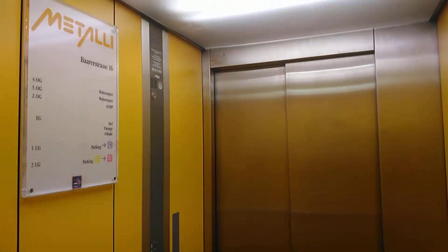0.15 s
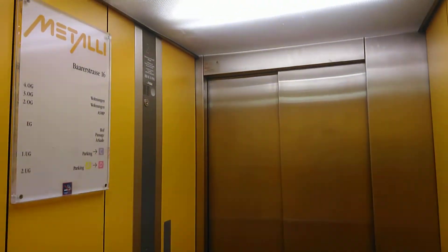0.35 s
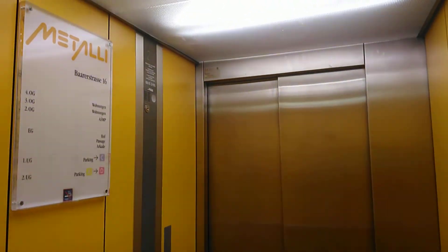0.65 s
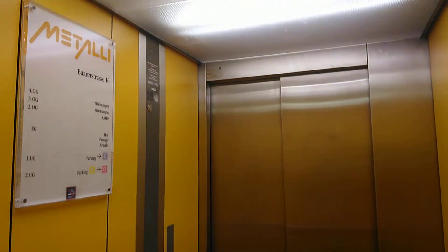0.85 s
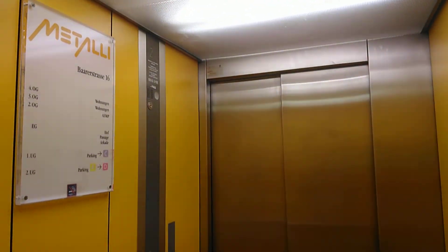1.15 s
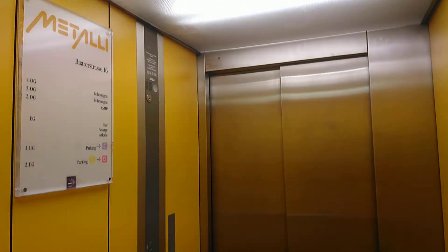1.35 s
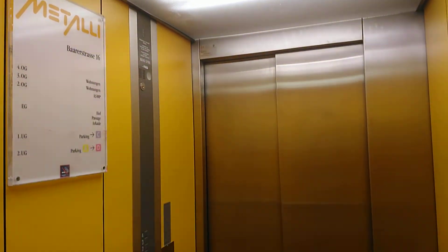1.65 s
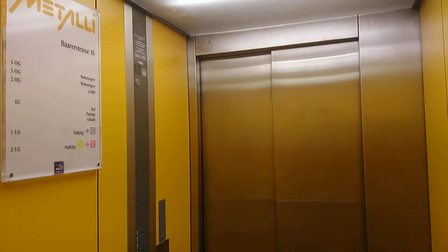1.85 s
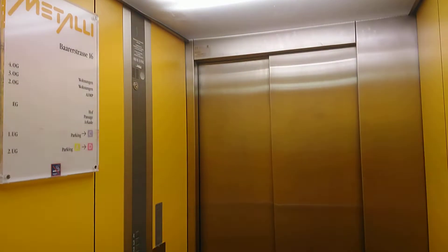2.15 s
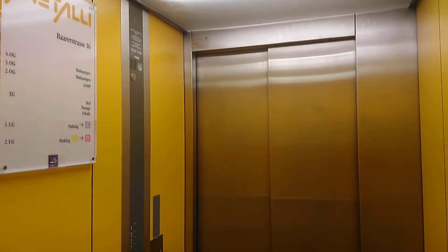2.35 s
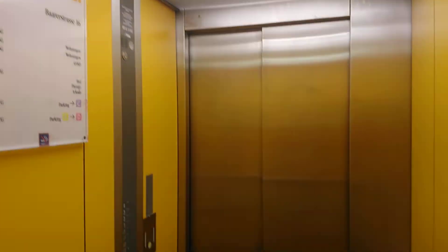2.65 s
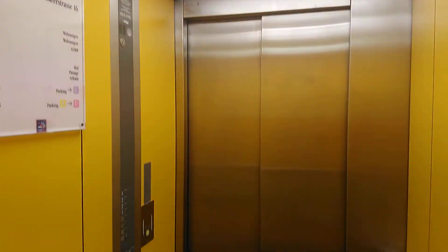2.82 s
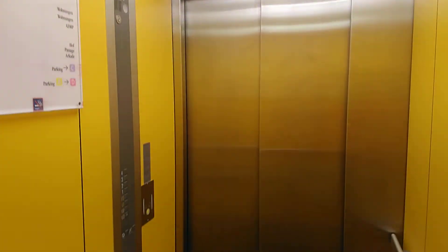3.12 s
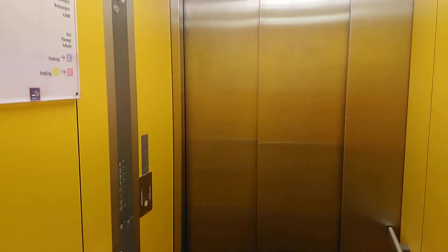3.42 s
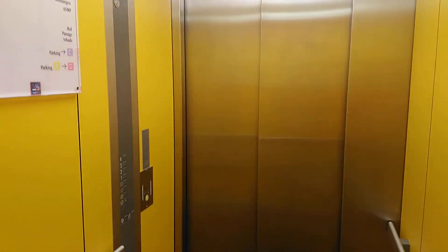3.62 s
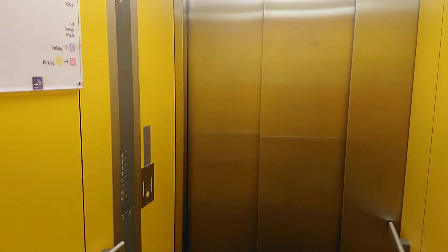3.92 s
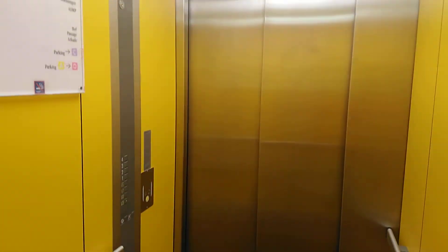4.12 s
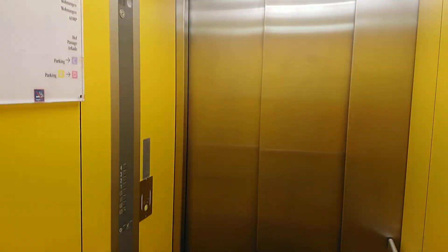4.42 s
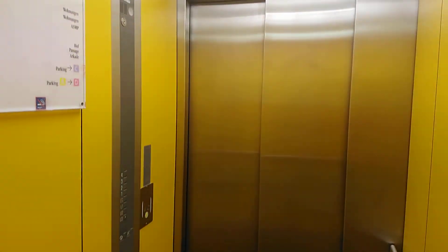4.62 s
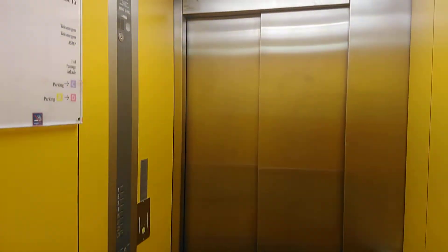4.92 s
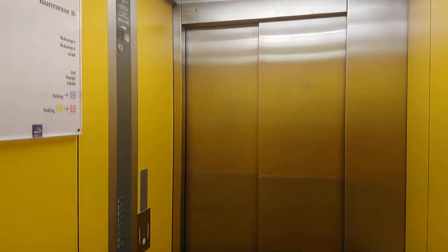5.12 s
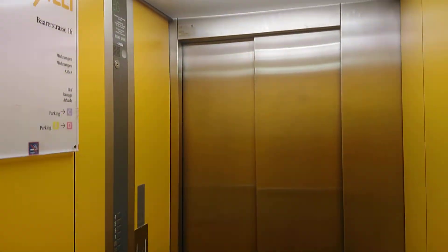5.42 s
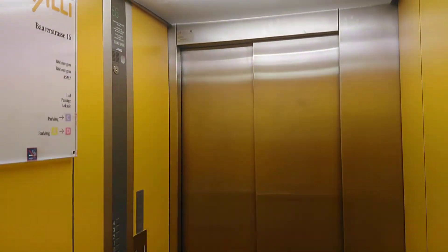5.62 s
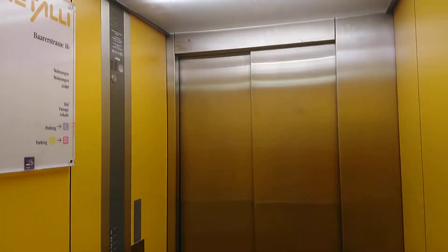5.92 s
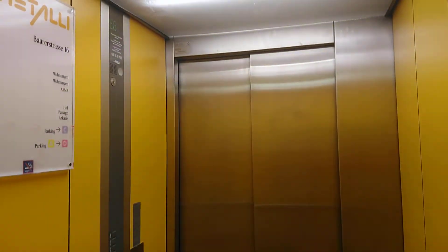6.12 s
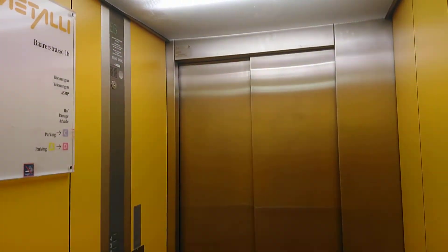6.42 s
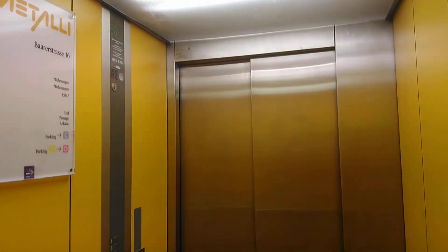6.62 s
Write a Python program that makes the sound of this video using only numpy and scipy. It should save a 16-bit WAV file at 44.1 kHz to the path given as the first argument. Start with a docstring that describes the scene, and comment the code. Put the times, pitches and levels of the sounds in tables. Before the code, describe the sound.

A quiet lift ride from within the car. The low motor drone dominates, swelling early, weakening around the middle with slow uneven beating, then returning. Under it is hum; above it, hollow guide-roller rumble, panel vibration and soft rushing air. Small dry ticks and gentle swishes pass by, then a fitting clinks and rattles briefly with tiny squeaks. Wide, enclosed stereo sound.

```python
"""The drive of a small passenger lift makes the cabin boom near 71 Hz, a sine that now and then throbs by beating.
A mains hum at 100 Hz and the random sway of the frame lie under it. Guide rollers rumble and drone through the
cabin's resonances, rail noise shakes the wall panels, and shaped noise makes the air rushing along the shaft.
Faint ticks (damped modes with reflections), squeaks (tone and noise) and swishes (bright noise) are scattered
through the ride, with one short metallic clink of ringing modes and rattle as the car passes a fitting."""
import sys
import numpy as np
from scipy import signal
from scipy.fft import rfft, irfft, next_fast_len
from scipy.io import wavfile

SR = 44100
rng = np.random.default_rng(int(sys.argv[2]) if len(sys.argv) > 2 else 0)


def bounce(signal):
    """Save signal as a 16-bit WAV file at the path given by the first command-line argument."""
    frames = np.transpose(np.atleast_2d(signal))
    limited = np.clip(frames, -1, 1)
    pcm = np.round(limited * 32767).astype(np.int16)
    wavfile.write(sys.argv[1], SR, pcm)


N = 298333
T = np.arange(N) / SR   # time, s
SIZE = next_fast_len(N)
BINS = np.maximum(np.arange(SIZE // 2 + 1) * SR / SIZE, 1)   # frequency of each spectral bin, Hz

# correlation of the sound field between left and right: frequency_hz, correlation (-1 to 1)
LIKENESS = [(60, 0.72), (160, 0.99), (260, 0.98), (330, 0.85), (450, 0.63), (740, 0.73), (1000, 0.39),
            (1250, -0.33), (2000, -0.066), (3500, 0.077), (15000, -0.12)]


def from_db(db):
    """Level to amplitude: 20 dB is a factor of ten."""
    return 10 ** (np.asarray(db) / 20)


def rms_one(x):
    """Normalisation to unit mean power."""
    return x / np.sqrt(np.mean(x ** 2) + 1e-20)


def gains(rows):
    """Level contours: each dB column, interpolated over time, becomes one gain per sample."""
    times, *columns = np.transpose(rows)
    return [from_db(np.interp(T, times, column)) for column in columns]


def over_hz(points):
    """Spectral contour: (Hz, value) points joined on a logarithmic frequency axis."""
    hz, value = np.transpose(points)
    return np.interp(np.log(BINS), np.log(hz), value)


def resonances(modes):
    """Modal superposition: the powers of steep-sided resonances add; each is 6 dB down at the edges of its width."""
    power = 0
    for hz, width, db in modes:
        detuning = 2 * (BINS - hz) / width
        power = power + from_db(db) ** 2 / (1 + detuning ** 2) ** 2
    return np.sqrt(power)


def coloured(x, response):
    """Linear filtering: the spectrum is multiplied by a frequency response."""
    return irfft(rfft(x, SIZE) * response, SIZE)[..., :N]


def cabin_noise(response):
    """Diffuse field: stereo noise of unit power whose left-right correlation depends on frequency."""
    alike = np.clip(over_hz(LIKENESS), -1, 1)
    mid = coloured(rng.standard_normal(N), response * np.sqrt(1 + alike))
    side = coloured(rng.standard_normal(N), response * np.sqrt(1 - alike))
    return rms_one(np.array([mid + side, mid - side]))


def drift(rate_hz):
    """Random modulation: low-passed noise of unit power, wandering faster at a higher rate."""
    return rms_one(coloured(rng.standard_normal(N), 1 / (1 + (BINS / rate_hz) ** 4)))


def swell(middle, length):
    """Gaussian envelope that rises to one and fades."""
    return np.exp(-np.minimum((2 * (T - middle) / length) ** 2, 20))


def dying(start, t60):
    """Exponential decay from a sudden start at one, falling 60 dB in t60 seconds."""
    age = T - start
    return (age >= 0) * np.exp(-np.clip(np.log(1000) * age / t60, 0, 40))


def wavering(hz, width):
    """Frequency modulation: a stereo tone of even strength wanders in pitch; its phase gap sets the correlation."""
    turns = np.cumsum(hz + width / 2 * drift(width / 2)) / SR
    alike = np.clip(np.interp(hz, *np.transpose(LIKENESS)), -1, 1)
    phase_gap = np.arccos(alike) * np.array([[.5], [-.5]])
    return np.sqrt(2) * np.sin(2 * np.pi * turns + phase_gap)


def drive(boom_trim_db=0.13, hum_trim_db=0.0, sway_db=-40.5):
    """Forced vibration and beating: two low tones fill the cabin over its swaying frame; a third beats in bouts."""
    # boom of the drive, weakest in mid-ride: time_s, level_db (before trim)
    boom_curve = [(0, -29.5), (0.2, -28.5), (0.45, -25.8), (1.1, -21.8), (1.7, -23.2), (2.2, -25),
                  (2.72, -25.6), (3.1, -31), (3.45, -31.7), (4.05, -36.8), (4.55, -34.4), (4.95, -30.3),
                  (5.2, -33), (5.4, -27.8), (5.68, -23.7), (6.05, -24.5), (6.76, -24.3)]
    # bouts of a slightly lower vibration: central_dip_s, length_s, beat_hz, level_db
    throb_bouts = [(0.2, 0.28, 4.8, -32), (1.49, 0.15, 5, -39), (2.852, 0.24, 7.2, -34),
                   (3.545, 0.28, 5.6, -38.5), (3.757, 0.25, 5.6, -33.8), (3.944, 0.19, 5.3, -36),
                   (4.125, 0.11, 5.2, -37), (4.266, 0.28, 5.6, -37.5), (4.425, 0.2, 6, -38.5),
                   (4.58, 0.2, 9.4, -40.5), (4.825, 0.27, 5.1, -36), (5.19, 0.26, 3, -37),
                   (5.86, 0.42, 4.2, -38), (6.44, 0.22, 6, -36), (6.6, 0.26, 7, -34.5)]
    # mains hum: time_s, level_db (before trim and waver)
    hum_curve = [(0, -37.5), (0.7, -34.5), (1.25, -42), (1.7, -41.5), (2.1, -43.5), (2.95, -35), (3.5, -38),
                 (4, -43.5), (4.7, -39.5), (5.15, -32.5), (5.9, -35), (6.25, -34.5), (6.76, -34)]
    # sway of the cabin on its frame: frequency_hz, width_hz, relative_db
    frame_modes = [(38.5, 8.7, -25), (46, 3.1, -6), (53.3, 8, -16), (66.7, 8.2, -8.5), (75, 24, -7),
                   (80.8, 13, -1), (119.5, 21, -12.5), (151, 19, -22)]
    boom_hz, mains_hum_hz = 71.15, 100.0
    waver_db, waver_rate_hz = 1.38, 4.5
    sway_share = 0.55   # the frame sways more when the boom is strong, by this exponent

    effort, = gains(boom_curve)
    boom = from_db(boom_trim_db) * effort * np.sin(2 * np.pi * boom_hz * T)
    for middle, length, beat_hz, db in throb_bouts:
        # opposite in phase to the boom at the central dip
        lower_turns = boom_hz * T - beat_hz * (T - middle)
        boom -= from_db(db) * swell(middle, length) * np.sin(2 * np.pi * lower_turns)

    hum_level, = gains(hum_curve)
    waver = from_db(hum_trim_db + waver_db * drift(waver_rate_hz))
    hum = hum_level * waver * np.sin(2 * np.pi * (mains_hum_hz * T + rng.random()))

    sway_level = from_db(sway_db) * rms_one(effort) ** sway_share
    sway = sway_level * cabin_noise(resonances(frame_modes))
    return np.sqrt(2) * (boom + hum) + sway   # root two turns rms levels into sine peaks


def ride(roller_trim_db=-1.0, rail_trim_db=0.0, rush_trim_db=2.0, hiss_db=-63.5):
    """Resonant excitation: rollers drive the cabin air, rails shake the panels, and air streams past the car."""
    # levels before trims: time_s, roller_rumble_db, rail_noise_db, air_rush_db
    ride_curves = [(0, -57, -59, -60.5), (0.45, -54.5, -60, -62), (1.05, -55.5, -60, -63.5),
                   (1.35, -53, -58.5, -62), (2.4, -51.5, -58.5, -64), (3, -50.5, -58.5, -64.5),
                   (4.1, -52, -60.5, -64), (4.7, -50, -58, -64.5), (5.25, -49, -56.5, -62.5),
                   (5.6, -49.5, -57.5, -63), (5.92, -55, -56.5, -60.5), (6.15, -47.5, -56, -62),
                   (6.76, -47, -57, -62)]
    # air modes of the cabin: frequency_hz, width_hz, relative_db
    cabin_modes = [(169, 46, -7), (191, 34, -6), (202, 22, -14), (242.3, 14, -3), (261.2, 23, -6.5),
                   (269.4, 19, -6.5), (315, 36, -5.5), (343.5, 17, -8.5)]
    # wall panel modes: frequency_hz, width_hz, relative_db
    panel_modes = [(419, 34, -0.5), (439.6, 13, -5.5), (452.4, 10, 2.5), (485, 28, -5.5), (572.6, 24, -1),
                   (600.6, 18, 0), (628, 38, -3), (718, 17, -0.5), (739.4, 20, -2), (775.7, 9, 2.5),
                   (720, 440, -16.5), (849, 45, -5.5), (895, 44, -8.5), (935, 29, -5.5), (1033, 43, -6),
                   (1194, 34, -10.5)]
    # spectral density of the air in the shaft: frequency_hz, relative_db
    rush_spectrum = [(400, -12), (800, -8), (1100, 0), (1350, 0), (1600, -5), (2200, -6.5), (2800, -13),
                     (4500, -17.5), (9000, -35.5)]
    # spectral density of the hiss: frequency_hz, relative_db
    hiss_spectrum = [(1500, -9.5), (3000, -9.5), (4300, -3.5), (5000, -6), (6000, -.5), (7000, -0.5),
                     (8000, -5.5), (10000, -13.5), (14000, -19), (15500, -25)]
    uneven_db, uneven_rate_hz = 1.34, 2.2
    panel_share = 0.3   # the panels feel this share of the rollers' unevenness in dB
    hiss_share = 0.31   # the hiss follows the air rush by this exponent

    roller, rail, rush = gains(ride_curves)
    uneven = uneven_db * drift(uneven_rate_hz)
    rumble = from_db(roller_trim_db + uneven) * roller * cabin_noise(resonances(cabin_modes))
    panels = from_db(rail_trim_db + panel_share * uneven) * rail * cabin_noise(resonances(panel_modes))
    air = from_db(rush_trim_db) * rush * cabin_noise(from_db(over_hz(rush_spectrum)))
    hiss_level = from_db(hiss_db) * rms_one(rush) ** hiss_share
    hiss = hiss_level * cabin_noise(from_db(over_hz(hiss_spectrum)))
    return rumble + drones(roller) + panels + air + hiss


def drones(roller, surge_trim_db=0.0):
    """Modal selection: two strong air modes hold the rollers' drone, which surges on uneven stretches of rail."""
    # drones: frequency_hz, wander_hz, level_db (against the roller curve)
    drone_modes = [(187.5, 6, -11.5), (252, 8, -11)]
    # surges: middle_s, length_s, drone_hz, level_db (before trim)
    surge_bouts = [(0.41, 0.18, 252, -57), (1.35, 0.14, 252, -51.5), (1.66, 0.1, 252, -54),
                   (1.9, 0.1, 252, -53.5), (2.14, 0.13, 252, -52.5), (2.93, 0.14, 252, -50),
                   (3.11, 0.13, 252, -49), (3.3, 0.25, 252, -56), (3.7, 0.15, 252, -56),
                   (4.63, 0.12, 252, -52.5), (4.76, 0.12, 252, -52), (4.98, 0.12, 252, -52.5),
                   (6.045, 0.09, 252, -48), (6.22, 0.13, 252, -50), (1.5, 0.16, 187.5, -55),
                   (1.78, 0.18, 187.5, -53.5), (2.53, 0.12, 187.5, -53), (2.67, 0.15, 187.5, -51.5),
                   (3.05, 0.13, 187.5, -52), (3.25, 0.12, 187.5, -52), (5.25, 0.08, 187.5, -53),
                   (5.44, 0.11, 187.5, -53), (5.82, 0.1, 187.5, -52), (6.14, 0.08, 187.5, -51.5)]
    out = 0
    for hz, width, db in drone_modes:
        surge = 0
        for middle, length, drone_hz, level in surge_bouts:
            if drone_hz == hz:
                surge = surge + from_db(level + surge_trim_db) * swell(middle, length)
        out += (from_db(db) * roller + surge) * wavering(hz, width)
    return out


def squeaks():
    """Friction-fed resonance: light rubbing of the guide shoes swells and fades, part held tone, part noise."""
    # squeaks: middle_s, length_s, frequency_hz, width_hz, level_db, tone_share (of power, 0-1)
    squeak_rows = [(0.09, 0.23, 1190, 16, -57.5, .85), (0.12, 0.26, 2100, 1600, -63.5, 0),
                   (1.36, 0.43, 4390, 450, -72.5, 0), (5.91, 0.11, 4315, 50, -67.5, .8),
                   (5.935, 0.07, 3840, 40, -69.5, .8), (6.023, 0.028, 4290, 70, -61.5, .85),
                   (6.02, 0.045, 3855, 50, -67.5, .8), (6.06, 0.11, 4310, 40, -70, .9),
                   (5.96, 0.14, 940, 70, -59.5, .4)]
    out = 0
    for middle, length, hz, width, db, tone in squeak_rows:
        share = np.clip(tone, 0, 1)
        sound = np.sqrt(1 - share) * cabin_noise(resonances([(hz, width, 0)]))
        if share > 0:
            sound += np.sqrt(share) * wavering(hz, width)
        out += from_db(db) * swell(middle, length) * sound
    return out


def swishes():
    """Broadband friction: something brushing along the shaft gives bright noise that swells and fades."""
    # swishes: middle_s, length_s, level_db
    swish_rows = [(0.24, 0.4, -65), (1.327, 0.39, -63), (2.65, 0.29, -68.5), (4.022, 0.58, -64)]
    # their spectral density: frequency_hz, relative_db
    swish_spectrum = [(2000, -18.5), (3300, -6), (4400, -4), (5200, -1.5), (7000, -1), (9000, -7),
                      (11000, -14.5), (15000, -18)]
    strength = sum(from_db(db) * swell(middle, length) for middle, length, db in swish_rows)
    return strength * cabin_noise(from_db(over_hz(swish_spectrum)))


def ticks(direct_trim_db=2.0, scatter_trim_db=-3.5):
    """Impulse response and reverberation: a damped panel mode, then wall reflections as dying noise in its band."""
    # ticks and knocks of the panels, levels before trims:
    # start_s, level_db, centre_hz, width_hz, scatter_t60_s, left_minus_right_db
    tick_rows = [(0.689, -45, 317, 13, 0.37, -5), (0.696, -49.5, 445, 50, 0.48, 0.5),
                 (0.69, -53, 613, 60, 0.15, 1), (0.699, -52, 950, 600, 0.2, -3),
                 (1.7612, -53, 2100, 700, .05, 0), (1.8048, -53.5, 2000, 600, .05, -5),
                 (2.72, -59, 11000, 5000, 0.087, 7), (3.5242, -42.5, 1950, 1100, 0.019, 7),
                 (3.525, -51, 4900, 1200, .012, 0), (3.525, -55, 11100, 900, 0.014, 5),
                 (3.532, -51, 8500, 6900, .016, 1), (3.564, -55, 1580, 1600, 0.54, -2),
                 (4.6882, -37.5, 9800, 6700, 0.0075, 7), (4.926, -48, 1050, 55, .03, 1),
                 (4.925, -49, 1095, 40, .03, 8), (4.926, -53, 2800, 2500, .03, 3),
                 (4.949, -54, 3170, 1400, .04, -1), (5.461, -47, 760, 400, .03, 0),
                 (5.808, -51, 2000, 1900, 0.27, -3), (5.842, -50, 2000, 1400, 0.066, -5),
                 (5.855, -53, 2400, 800, .05, -2)]
    out = np.zeros((2, N))
    for start, db, hz, width, t60, pan_db in tick_rows:
        ring_t60 = np.log(1000) / (np.pi * width)   # a wider resonance dies sooner
        ring = dying(start, ring_t60) * np.sin(2 * np.pi * hz * (T - start))
        build_up = np.clip((T - start) * hz / 2, 0, 1)   # reflections gather over two cycles
        scatter = build_up * dying(start, t60) * cabin_noise(resonances([(hz, width, 0)]))
        tick = from_db(direct_trim_db) * ring + from_db(scatter_trim_db) * scatter
        out += from_db(db) * tick * from_db([[pan_db / 2], [-pan_db / 2]])
    return out


def clink(ring_trim_db=-1.0, rattle_trim_db=-1.6, rattle_t60=0.29):
    """Modal ringing after impact: quick contacts rattle a metal fitting in uneven grains; its strong modes ring on."""
    # contacts of the fitting: start_s, level_db (before trims)
    contacts = [(5.7758, -48), (5.782, -46.5), (5.789, -46.5), (5.803, -54), (5.808, -54), (5.829, -58),
                (5.85, -63), (6.05, -64)]
    # what it rings with: frequency_hz, relative_db (before trim), t60_s
    metal_modes = [(3900, -18, .45), (4303, -21, .5), (4863, -12.5, .25), (4908, -12.5, .35),
                   (4968, -9.5, .28), (5034, -13, .22), (6019, -15, .3), (6562, -4.5, .19), (6645, -10, .2),
                   (7133, -10, .22), (7213, -11, .28), (7270, -7.5, .22), (8280, -16, .35),
                   (8382, -14, .18)]
    # spectral density of its rattle: frequency_hz, relative_db
    rattle_spectrum = [(900, -8), (1400, -4), (2400, -1), (3000, -5.5), (3600, -9), (4000, 1), (4400, -4),
                       (4950, 4), (5400, -6), (6500, 4), (6850, -2), (7400, 1.5), (7900, -11), (10000, -12),
                       (11200, -21), (12600, -19), (14500, -28)]
    grain_db, grain_rate_hz = 2.2, 300

    def struck(t60):
        """Energy addition: the powers of the decaying contacts sum."""
        return np.sqrt(sum((from_db(db) * dying(start, t60)) ** 2 for start, db in contacts))

    grains = rms_one(from_db(grain_db * drift(grain_rate_hz)))
    rattle = grains * cabin_noise(from_db(over_hz(rattle_spectrum)))
    out = from_db(rattle_trim_db) * struck(rattle_t60) * rattle
    for hz, db, t60 in metal_modes:
        # reflections bring each mode to the two sides at unrelated phases
        tone = np.sin(2 * np.pi * (hz * T + rng.random((2, 1))))
        out += from_db(db + ring_trim_db) * struck(t60) * tone
    return out


def scene():
    """Superposition: everything heard from inside the car adds."""
    return drive() + ride() + squeaks() + swishes() + ticks() + clink()


def record(dry):
    """Transducer response: two microphones agree in the bass and differ in colour above it; the top is cut."""
    # long waves reach both microphones alike: frequency_hz, left_minus_right_db
    bass_balance = [(150, 0)]
    # above the bass the microphones differ: frequency_hz, left_minus_right_db
    mic_balance = [(250, -1), (550, 2), (1200, -2.5), (2800, 0.4), (4400, -1), (5100, 2), (6400, -2),
                   (8000, 5.5), (11300, 1.5), (13500, 0)]
    cutoff_hz = 15000
    balance_db = over_hz(bass_balance + mic_balance) * [[.5], [-.5]]
    heard = coloured(dry, from_db(balance_db))
    low_pass = signal.ellip(10, .1, 80, cutoff_hz, fs=SR, output="sos")   # 0.1 dB ripple, 80 dB stop band
    return signal.sosfilt(low_pass, heard)


dry = scene()
out = record(dry)
bounce(out)
```